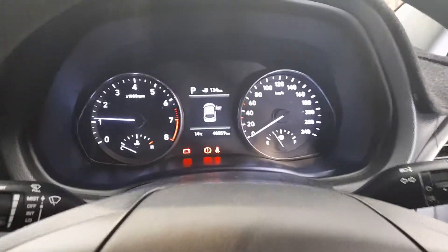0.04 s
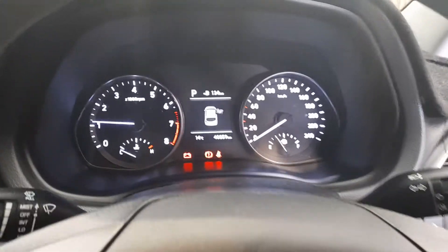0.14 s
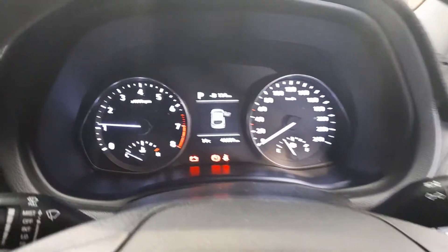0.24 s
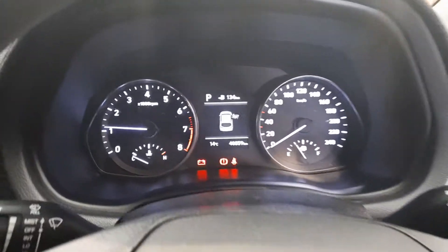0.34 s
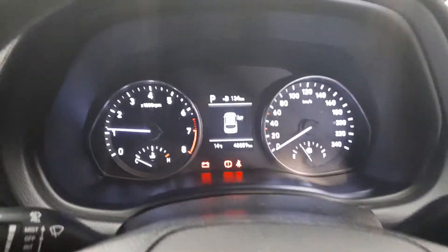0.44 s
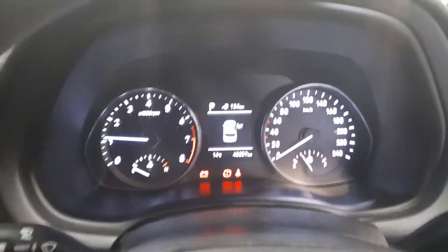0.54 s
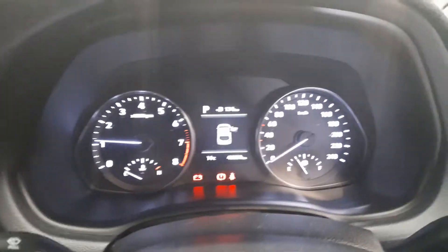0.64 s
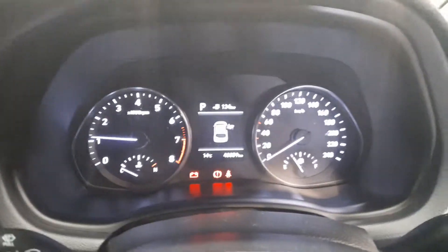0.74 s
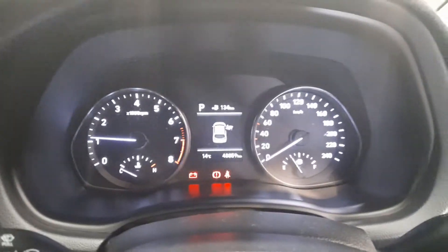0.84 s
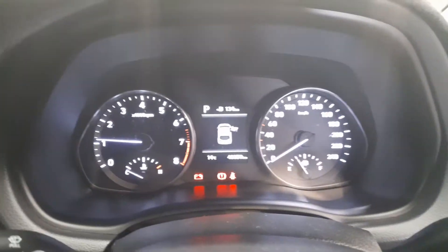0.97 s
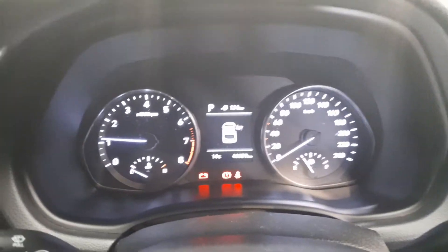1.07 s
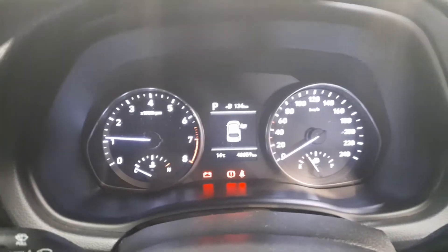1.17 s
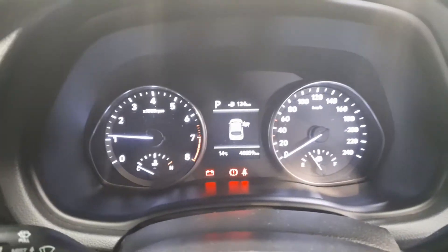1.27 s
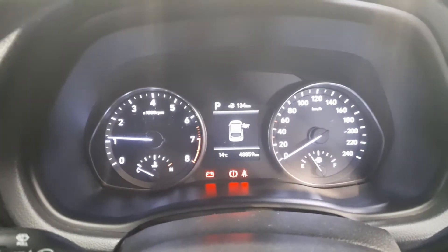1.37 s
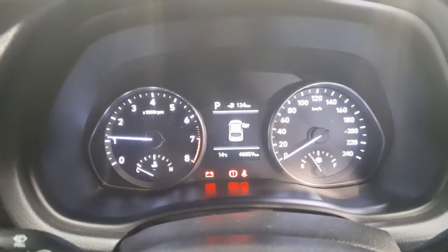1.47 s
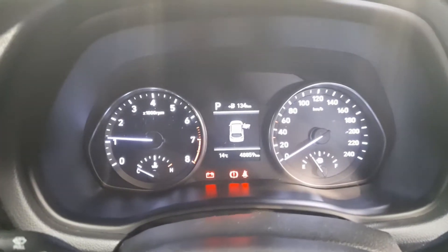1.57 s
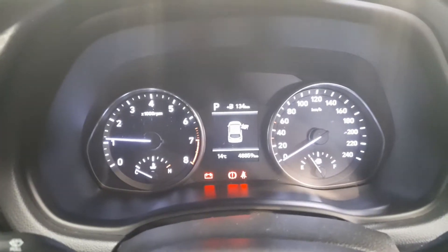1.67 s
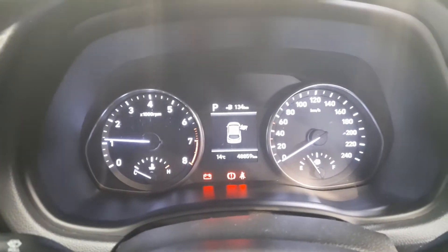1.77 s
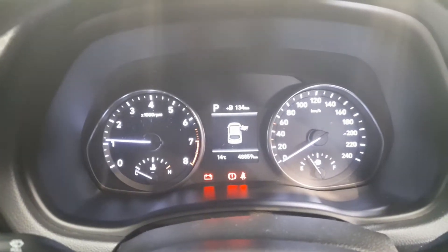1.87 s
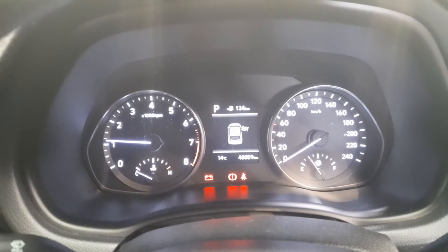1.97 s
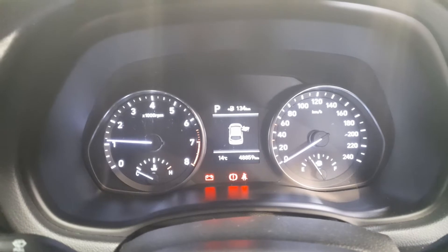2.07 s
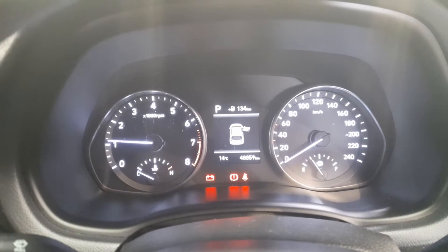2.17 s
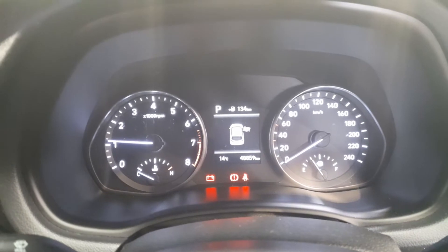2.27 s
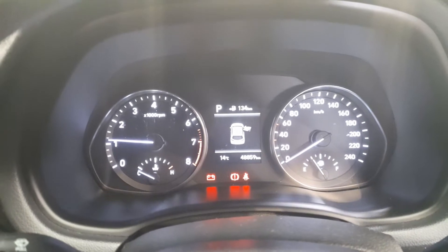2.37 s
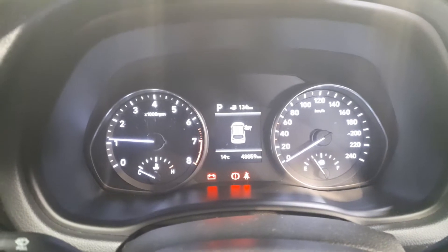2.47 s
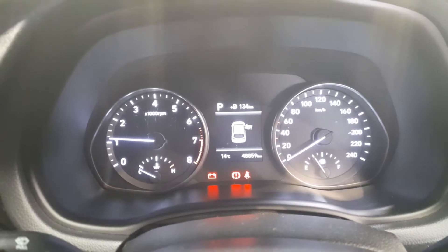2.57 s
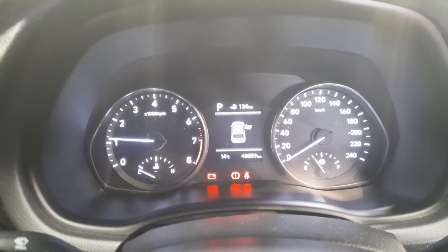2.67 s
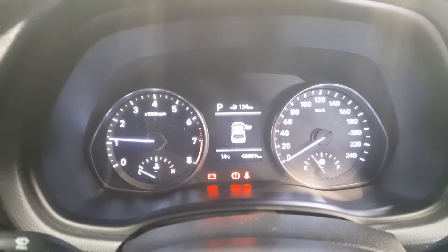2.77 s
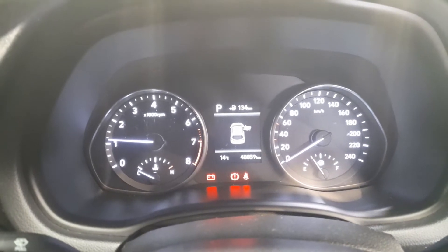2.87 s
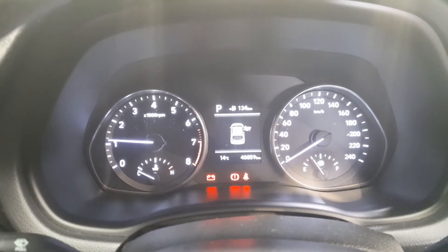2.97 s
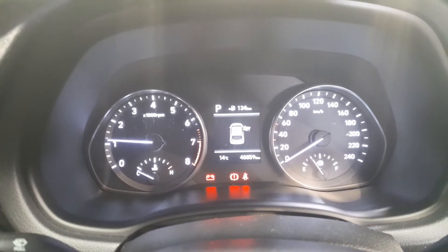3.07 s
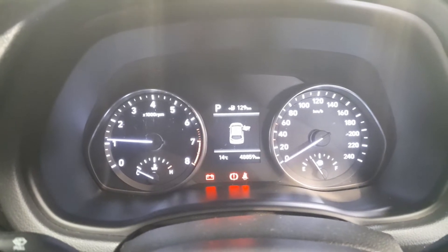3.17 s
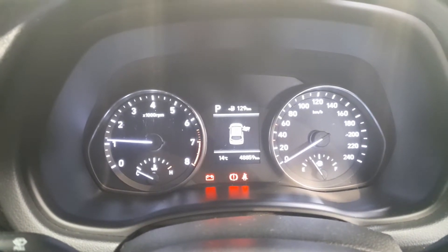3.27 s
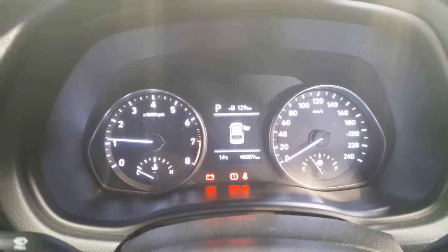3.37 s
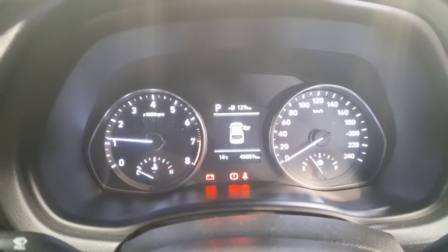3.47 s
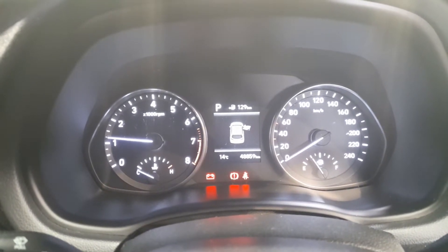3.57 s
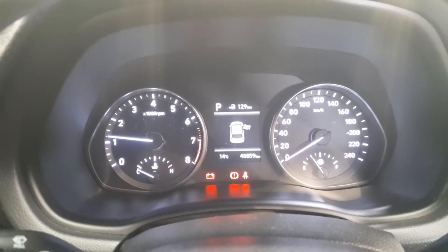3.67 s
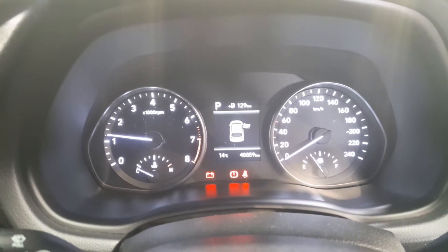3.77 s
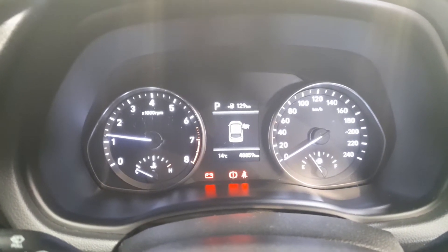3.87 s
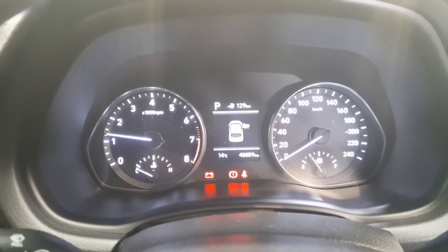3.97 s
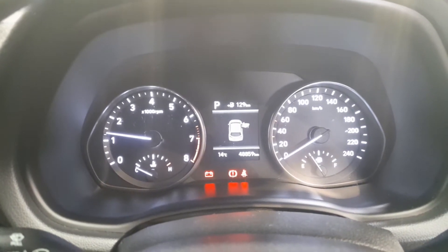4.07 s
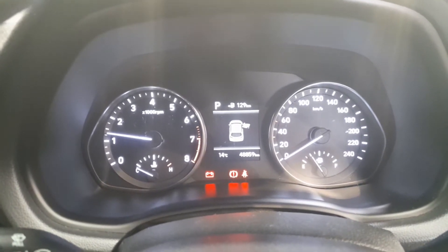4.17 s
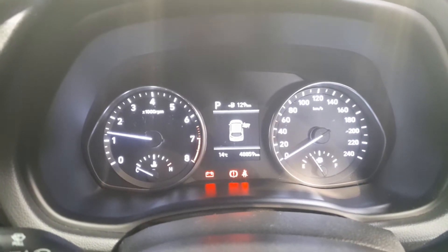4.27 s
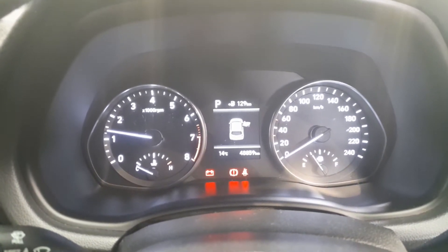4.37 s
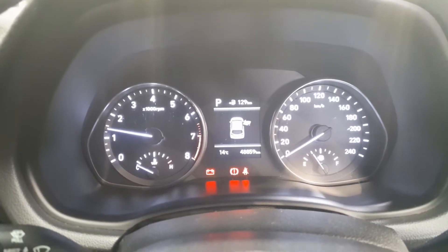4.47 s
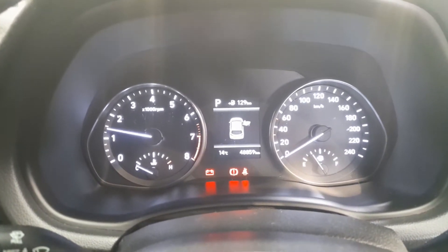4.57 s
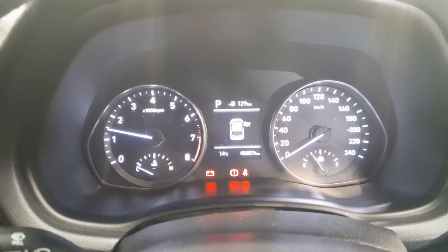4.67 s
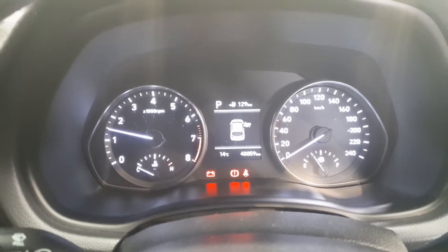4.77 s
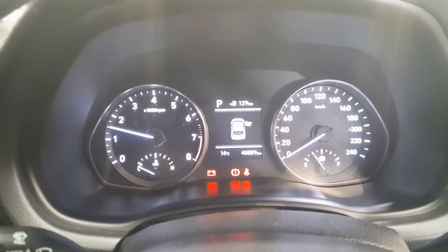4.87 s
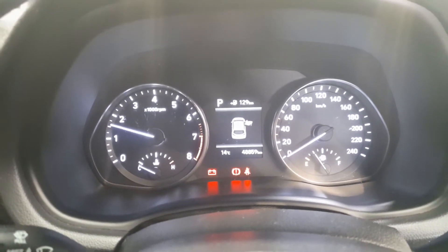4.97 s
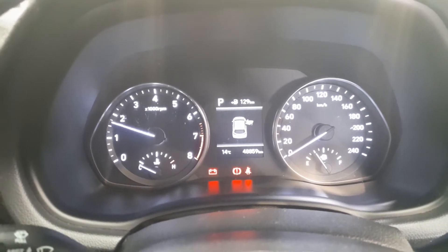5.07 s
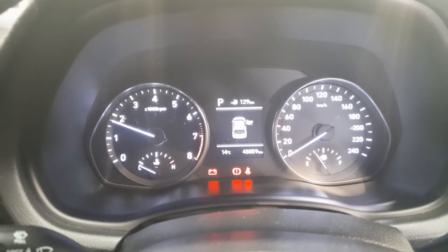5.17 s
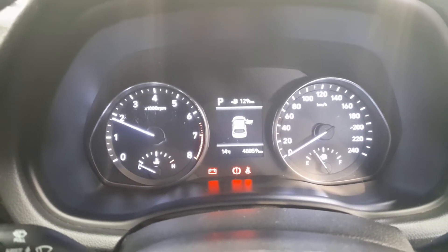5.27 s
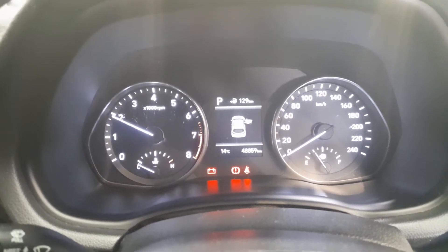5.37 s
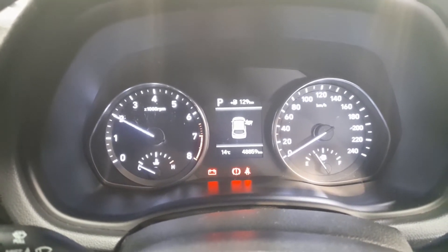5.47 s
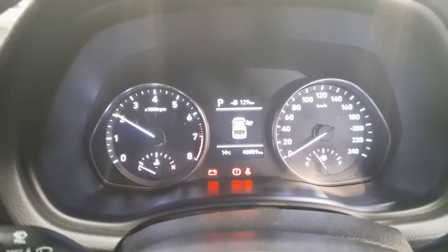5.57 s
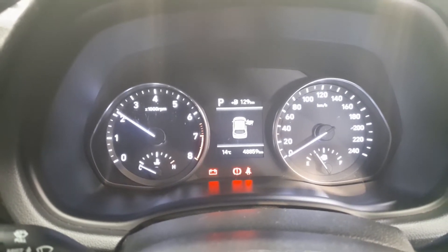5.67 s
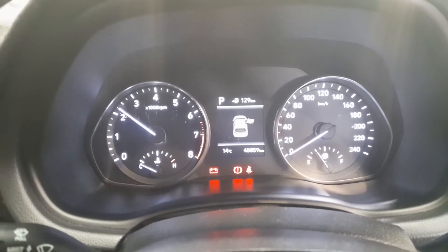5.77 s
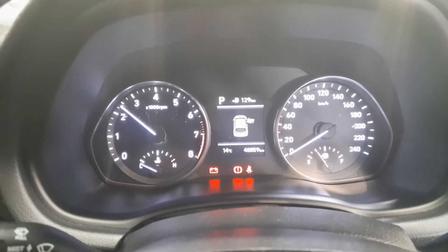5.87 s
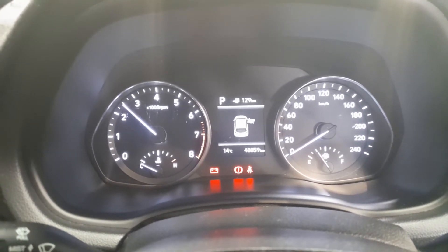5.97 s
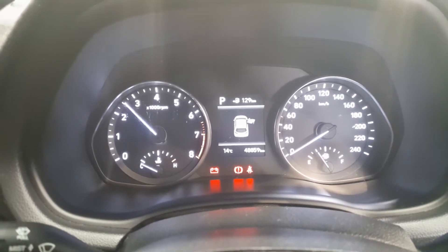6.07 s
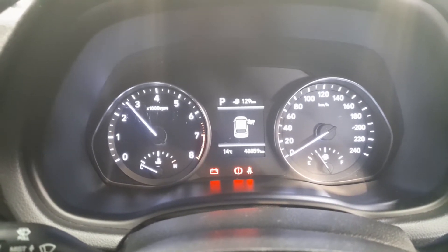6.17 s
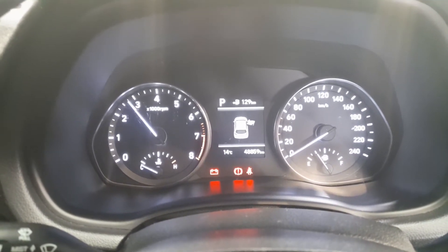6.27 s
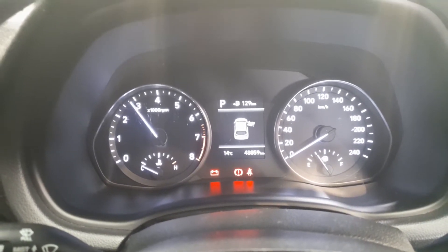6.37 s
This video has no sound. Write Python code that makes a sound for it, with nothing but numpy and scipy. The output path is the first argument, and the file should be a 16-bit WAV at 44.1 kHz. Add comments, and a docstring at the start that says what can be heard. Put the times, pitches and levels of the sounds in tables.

```python
"""A four-cylinder petrol engine idles fast, then is slowly revved; the microphone is at the driver's seat.
Its firing booms in the air modes of the parked car's cabin, under the growl of unequal cylinders, ringing
panels, a belt whine, and the hiss, ticking and intake roar of the engine bay. Early on, right at the
microphone, the hand shifts its grip with snaps, a knock and a rustle. Two faint squeaks and a scuff pass;
about two seconds in, something hoarse sounds far outside."""
import sys
import numpy as np
from scipy import signal
from scipy.fft import rfft, irfft, next_fast_len
from scipy.io import wavfile

SR = 44100
rng = np.random.default_rng(int(sys.argv[2]) if len(sys.argv) > 2 else 0)


def log_audio(samples):
    """Write samples as a 16-bit WAV file to the path given in sys.argv[1]."""
    # one column per channel
    frames = np.atleast_2d(samples).T
    # limit to full scale, then quantise
    limited = np.clip(frames, -1, 1)
    pcm = np.round(limited * 32767).astype(np.int16)
    wavfile.write(sys.argv[1], SR, pcm)


N = 283122
PORT_LAG_S = 0.00029  # the engine reaches the microphone's left port this much after the right


def from_db(db):
    """Decibels to gain."""
    return 10 ** (np.asarray(db) / 20)


def rms_one(x):
    """Scale to unit power."""
    return x / np.sqrt(np.mean(x ** 2) + 1e-20)


def in_time(rows):
    """A curve of (time, value) rows, sample by sample."""
    times, values = np.transpose(rows)
    return np.interp(np.arange(N) / SR, times, values)


def at_hz(points, hz):
    """Read a spectrum on a log-frequency axis."""
    knots_hz, values = np.transpose(points)
    return np.interp(np.log(hz + 1e-9), np.log(knots_hz), values)


def peaks_db(resonances, hz):
    """Gain in dB of a set of peaks and dips, met at a moving frequency."""
    grid = np.geomspace(30, 1500, 3000)
    response_db = sum(db / (1 + (2 * (grid - centre) / width) ** 2) for centre, width, db in resonances)
    return np.interp(hz, grid, response_db)


def level_db_at(law, octaves, throttle):
    """A layer's level steps as the throttle opens and follows a power of the octaves above idle."""
    idle_db, open_db, octave_db, exponent = law
    return idle_db + open_db * throttle + octave_db * octaves ** exponent


def pan(side_db):
    """Left and right gains for a level difference, left minus right."""
    gains = from_db(np.array([[.5], [-.5]]) * side_db)
    return gains / gains.mean(axis=0)


def arch(start_s, length_s):
    """A half-sine rise and fall."""
    return np.sin(np.pi * np.clip((np.arange(N) / SR - start_s) / length_s, 0, 1))


def drift(rate_hz):
    """A random wander of unit power."""
    knots = rng.standard_normal(2000)
    return rms_one(np.interp(np.arange(N) / SR * rate_hz, np.arange(len(knots)), knots))


def resonate(x, hz, width_hz):
    """One resonance with gain 1 at its peak."""
    r = np.exp(-np.pi * width_hz / SR)
    feedback = [1, -2 * r * np.cos(2 * np.pi * hz / SR), r * r]
    return signal.lfilter(np.array([1, 0, -1]) * (1 - r * r) / 2, feedback, x + 1e-18)


def noise(spectrum):
    """Two unrelated noises of one colour."""
    size = next_fast_len(N)
    hz = np.arange(size // 2 + 1) * SR / size
    white = rfft(rng.standard_normal((2, size)))
    return rms_one(irfft(white * from_db(at_hz(spectrum, hz)), size)[:, :N])


def narrow(hz, width_hz):
    """Two unrelated narrow bands of noise around a centre that may move."""
    lowpass = signal.butter(2, np.clip(width_hz / 2, 2, 4000), fs=SR, output="sos")
    a, b = signal.sosfilt(lowpass, rng.standard_normal((2, 2, N)))
    angle = 2 * np.pi * np.cumsum(hz * np.ones(N)) / SR
    return rms_one(a * np.cos(angle) + b * np.sin(angle))


def at_ports(pair):
    """The cabin field at the microphone, at unit level: alike in the bass, stronger on the right."""
    # likeness of the two ports: (frequency [Hz], correlation [ratio])
    likeness = [(60, 1), (150, 0.91), (300, 0.73), (600, 0.88), (1200, 0.6), (2500, 0.15), (5000, 0.059),
                (16000, 0.041)]
    # their balance: (frequency [Hz], left minus right [dB])
    balance = [(60, -2), (110, -3.5), (200, -3), (380, -5.5), (700, -0.5), (1290, 0), (2380, -6.5),
               (4400, -8.5), (8120, -4.5), (15000, -3.5)]
    size = next_fast_len(N)
    hz = np.arange(size // 2 + 1) * SR / size
    mid, side = rfft(pair, size)
    alike = np.clip(at_hz(likeness, hz), -.99, .999)
    field = np.sqrt(1 + alike) * mid + np.sqrt(1 - alike) * side * [[1], [-1]]
    field[0] *= np.exp(-2j * np.pi * hz * PORT_LAG_S)
    # reflections from glass and trim leave fine peaks and dips above the bass
    knots_hz = np.arange(0, SR / 2, 24)
    ripple_db = 1.8 * rng.standard_normal(len(knots_hz)) * np.minimum(knots_hz / 2500, 1)
    gains = pan(at_hz(balance, hz)) * from_db(np.interp(hz, knots_hz, ripple_db))
    out = irfft(field * gains, size)[:, :N]
    return out / np.std(out.mean(axis=0))


def left_late(pair):
    """Sound from the engine reaches the right port first."""
    n = np.arange(N)
    return np.array([np.interp(n - PORT_LAG_S * SR, n, pair[0]), pair[1]])


def far_swells(ring_hz=1700, yard_t60_s=1.1, yard_db=-1.5):
    """Far outside, a hoarse gliding tone stirs a steady ring and lingers between the yard's walls."""
    # swells: (start [s], length [s], first pitch [Hz], last pitch [Hz], relative level [dB])
    swells = [(1.94, 0.06, 680, 670, -50), (2.0, 0.19, 680, 790, -42.5), (2.183, 0.06, 870, 810, -41)]
    # their partials: (multiple of the pitch [ratio], width [Hz], relative level [dB])
    partials = [(1, 150, 0), (0.93, 330, -3), (1.97, 150, -9), (2.0, 900, -7)]
    pitch = in_time([point for s, length, first, last, _ in swells
                     for point in ((s, first), (s + length, last))])
    envelope = sum(from_db(db + 2) * arch(s, length) for s, length, _, _, db in swells)
    tone = sum(from_db(db) * narrow(multiple * pitch, width) for multiple, width, db in partials)
    ring = from_db(-5.5) * narrow(ring_hz, width_hz=120)
    direct = envelope * at_ports(tone + ring)
    echoes = rng.standard_normal((2, SR)) * from_db(-60 * np.arange(SR) / SR / yard_t60_s)
    tail = signal.fftconvolve(direct, rms_one(echoes) / np.sqrt(SR), axes=1)[:, :N]
    return direct + from_db(yard_db) * tail


def squeaks(squeak_db=-71, rustle_db=-65.5, stutter_db=5.0, wander_hz=190, fade_s=0.069):
    """Two faint, very high squeaks stutter along their glides, over a fine rustle."""
    # one glide for each squeak: (time [s], pitch [Hz])
    glides = [
        [(1.07, 11900), (1.2, 11400), (1.33, 11600), (1.42, 12900), (1.56, 13300), (1.73, 11900), (1.84, 10300)],
        [(4.03, 14000), (4.13, 15100), (4.27, 15750), (4.42, 15200), (4.56, 15600), (4.75, 13400)],
    ]
    # the rustle: (frequency [Hz], relative density [dB])
    spectrum = [(7000, -40), (10000, -12), (11400, 0), (13500, 0), (15700, -4), (17000, -30)]
    t = np.arange(N) / SR
    out = 0
    for glide in glides:
        envelope = np.clip(np.minimum(t - glide[0][0], glide[-1][0] - t) / fade_s, 0, 1)
        level = from_db(squeak_db + stutter_db * drift(40))
        tone = level * narrow(in_time(glide) + wander_hz * drift(35), width_hz=300)
        out = out + np.sqrt(envelope) * tone + envelope * from_db(rustle_db) * noise(spectrum)
    return out


def scuff(start_s=5.095, level_db=-45.5, decay_s=0.055):
    """A brief hollow scuff starts at once and dies away as the revs climb."""
    age = np.arange(N) / SR - start_s
    envelope = (age >= 0) * np.exp(-np.abs(age) / decay_s)
    return from_db(level_db) * envelope * narrow(hz=1530, width_hz=300)


def finger_rubs(grain_db=2.5):
    """Fingers slide on the microphone's case with a grainy rustle, mostly on the right."""
    # slides: (start [s], length [s], relative level [dB])
    slides = [(0.3, 0.087, -63), (0.576, 0.27, -54), (3.77, 0.11, -59.5)]
    # skin on the case: (frequency [Hz], relative density [dB])
    spectrum = [(150, 4.5), (300, 8.5), (600, -1), (1200, -4), (3000, -19.5), (6500, -13), (8200, -25),
                (12000, -21), (16000, -18)]
    envelope = sum(from_db(db + 10) * arch(s, length) for s, length, db in slides)
    return at_ports(noise(spectrum)) * envelope * from_db(grain_db * drift(190)) * pan(-14.0)


def finger_knocks(rise_s=0.0023, sealed_hz=180, closing_s=0.0011):
    """A fingertip bumps the right port, whose resonance drops as it is closed."""
    # bumps: (time [s], envelope peak [dB], starting pitch [Hz])
    bumps = [(0.633, -15.5, 1760), (0.723, -23, 400), (0.757, -24, 604)]
    out = 0
    for s, db, start_hz in bumps:
        age = np.clip(np.arange(N) / SR - s, 0, .1)
        turns = sealed_hz * age + (start_hz - sealed_hz) * closing_s * (1 - np.exp(-age / closing_s))
        envelope = age / rise_s * np.exp(1 - age / rise_s)
        out = out - from_db(db) * envelope * np.sin(2 * np.pi * turns)
    return out * from_db([[-26], [0]])


def case_snaps():
    """The microphone's case gives way in tiny snaps, each ringing for well under a millisecond."""
    # snaps: (time [s], peak [dB], left minus right [dB])
    snaps = [(.3318, -22, -26), (.3366, -22, -26), (.349, -33, -16), (.7127, -36, -16), (.76, -36, -18),
             (.8039, -33, -20), (.8268, -38, -13), (.8665, -37, 9), (1.033, -40, -14)]
    # modes of the case: (frequency [Hz], width [Hz], relative level [dB])
    modes = [(5400, 2000, 0), (13600, 2800, 0)]
    clicks = np.zeros((2, N))
    for s, db, side_db in snaps:
        ports = pan(side_db)[:, 0]
        clicks[:, int(s * SR)] = from_db(db) * ports / ports.max()
    rung = sum(from_db(db) * resonate(resonate(clicks, hz, width), hz, width) for hz, width, db in modes)
    return rung * clicks.max() / np.abs(rung).max()


def body_rumble(growl_db, idle_db=-42.0, growth=0.16):
    """Loose low noise of the car's body, all round the seat, grows more slowly than the growl."""
    # the rumble: (frequency [Hz], relative density [dB])
    spectrum = [(20, -43), (35, 9), (70, 5.5), (110, 7), (170, 3), (220, -1.5), (260, -2), (350, -3),
                (520, -8), (750, -4.5), (1050, -16.5), (1600, -50)]
    return from_db(idle_db + growth * (growl_db - growl_db[0])) * at_ports(noise(spectrum))


def trim_buzz(firings, firing_hz, throb=0.56):
    """A loose piece of trim buzzes, in time with the firing, at the engine speeds that shake it."""
    # those speeds: (firing rate [Hz], span [Hz], level [dB])
    speeds = [(62, 7, -52.5), (67, 6, -51), (95.4, 1.1, -46)]
    shake = sum(from_db(db) * np.exp(-(2 * (firing_hz - rate) / span) ** 2) for rate, span, db in speeds)
    return shake * (1 + throb * np.cos(2 * np.pi * firings)) * at_ports(narrow(hz=710, width_hz=100))


def bay_hiss(firings, bay_db, throb=0.041, flutter_db=0.5):
    """Air and friction noise of the engine bay, throbbing with the firing."""
    # the hiss: (frequency [Hz], relative density [dB])
    spectrum = [(300, -24), (700, -3.5), (1050, -3), (1700, 0.5), (2050, -1), (2800, -3.5), (3200, -11),
                (4500, -14), (5300, -10), (6300, -15), (7200, -22.5), (8200, -33.5), (10500, -25),
                (15000, -24.5)]
    air = at_ports(noise(spectrum)) * (1 + throb * np.cos(2 * np.pi * firings))
    return from_db(bay_db + 7 + flutter_db * drift(30)) * air


def valve_ticking(firings, bay_db, sharpness=2.5, floor=0.32):
    """A short rattle at each firing rings the valve gear."""
    # modes of the valve gear and its cover: (frequency [Hz], width [Hz], relative level [dB])
    modes = [(2577, 36, -14.5), (2764, 45, -7.5), (3506, 40, -14.5), (5200, 220, -35)]
    blows = floor + np.exp(-sharpness * (firings % 1))
    rattle = rng.standard_normal((2, N)) * blows
    valves = sum(from_db(db) * rms_one(resonate(rattle, hz, width)) for hz, width, db in modes)
    return from_db(bay_db - 9) * at_ports(valves)


def injector_whirr(firings, base_db=-56, wander_hz=11, throb=0.057):
    """The injectors' two rings wander and throb once per engine cycle, as one injector is louder."""
    # rings: (frequency [Hz], width [Hz], relative level [dB], share of the level swing [ratio])
    rings = [(1358, 62, 0, 1.0), (1605, 60, -2.5, 0.5)]
    # course of the lower ring: (time [s], level [dB])
    ring_level = [(0, -53), (.9, -56.5), (3.2, -57), (3.6, -54), (4.5, -51), (4.8, -65), (5.5, -50),
                  (6.2, -53.5), (6.42, -43)]
    swing_db = in_time(ring_level) - base_db
    out = 0
    for hz, width, db, share in rings:
        ring = at_ports(narrow(hz + wander_hz * drift(14), width))
        out = out + from_db(base_db + db + share * swing_db) * ring
    return out * (1 + throb * np.cos(np.pi * firings / 2))


def intake_roar(firings, octaves, full_db=-45, full_octaves=1.38, db_per_octave=25.5, throb=0.2):
    """Air rushes into the cylinders in gulps, and blooms near top speed."""
    # the roar: (frequency [Hz], relative density [dB])
    spectrum = [(800, -24), (1200, 7), (1550, -21), (1950, 6), (2300, -6.5), (2750, 7), (3200, -6.5),
                (4200, -17), (6500, -16), (9000, -32), (15000, -43)]
    level_db = full_db - db_per_octave * np.maximum(full_octaves - octaves, 0)
    return from_db(level_db) * (1 + throb * np.cos(2 * np.pi * firings)) * at_ports(noise(spectrum))


def belt_whine(firing_hz, octaves, throttle, idle_order=11.36, open_order=11.55, slip=0.00537):
    """A belt-driven rotor follows the crankshaft, slipping a little; it breaks up and fades with revs."""
    # level with speed: (idle [dB], open throttle adds [dB], first octave adds [dB], exponent)
    law = (-50, -1.8, -5, 4)
    # the panel that swells the passing whine: (frequency [Hz], width [Hz], lift [dB])
    panel = [(702, 36, 7)]
    order = idle_order + (open_order - idle_order) * throttle
    hz = firing_hz * order * (1 + slip * drift(11))
    level_db = level_db_at(law, octaves, throttle) + peaks_db(panel, hz) + 2.5 * drift(25.11)
    rough_share = np.clip(.1 + octaves, 0, .85)
    clean = np.sqrt(2 * (1 - rough_share)) * np.sin(2 * np.pi * np.cumsum(hz) / SR)
    rough = np.sqrt(rough_share) * narrow(hz, width_hz=90)[0]
    return from_db(level_db) * (clean + rough) * pan(-6.5)


def combustion_chuff(firings, octaves, top_db=-44, db_per_octave=13, sharpness=2.8, uneven_db=2.0):
    """At high revs each firing adds a rough puff of its own strength, thudding through the bulkhead."""
    # the puffs: (frequency [Hz], relative density [dB])
    spectrum = [(110, -41), (200, -1), (330, 5.5), (500, 2.5), (590, -10), (1000, -37), (4000, -72)]
    strengths = from_db(uneven_db * rng.standard_normal(int(firings[-1]) + 1))
    puffs = rms_one(strengths[firings.astype(int)] * np.abs(np.sin(np.pi * firings)) ** sharpness)
    level_db = top_db - db_per_octave * (octaves.max() - octaves)
    return from_db(level_db) * puffs * at_ports(noise(spectrum))


def cylinder_growl(firings, firing_hz, growl_db, crank_db=4.0, roughness=0.36):
    """Unequal cylinders repeat every four firings: wavering lines at quarter orders."""
    # how the body shapes the lines: (frequency [Hz], relative level [dB])
    spectrum = [(30, -40), (60, -25), (100, 15.5), (130, -3), (190, -15.5), (260, -1.5), (350, 7),
                (480, -7), (620, -12.5), (900, -20), (1300, -35), (2500, -40)]
    out = np.zeros((2, N))
    grid = np.geomspace(10, 3000, 600)
    for order in np.arange(3, 44) / 4:
        if order in (1, 2, 3, 4):
            continue
        lift_db = crank_db * (order % 0.5 == 0)  # whole turns of the crankshaft stand out
        gain = np.interp(order * firing_hz, grid, from_db(at_hz(spectrum, grid) + lift_db))
        angle = 2 * np.pi * ((order * firings + rng.random()) % 1)
        for part, wave in zip(out, (np.sin, np.cos)):
            part += gain * (1 + roughness * drift(16)) * wave(angle + roughness * drift(20))
    return from_db(growl_db) * at_ports(out)


def panel_overtones(firings, firing_hz, waver_db=2.5, other_share=0.23):
    """Each order sings while engine speed carries it through a panel resonance; high ones lean right."""
    # the engine's clean orders: (multiple of the firing rate [ratio], level before lift [dB])
    orders = [(2, -47.5), (2.5, -61.5), (3, -51), (3.5, -56.5), (4, -55.5), (4.5, -61), (5, -57.5),
              (5.5, -60), (6, -57), (7.5, -67.5), (9, -63.5), (9.5, -70.5), (10.5, -74), (15, -67)]
    # body panels: (frequency [Hz], width [Hz], lift [dB], order that gets the full lift [ratio])
    panels = [(105, 25.6, 16, 2), (132.7, 9.7, 14.5, 3), (145.2, 3.9, 13, 2), (192.8, 19, 8.5, 3),
              (192.4, 8.7, 7, 2), (239.1, 19, 18, 4), (286, 18, 13.5, 3), (312, 19, 19.5, 3.5),
              (360, 41, 5, 4), (480, 46, 15, 5.5), (516, 12, 10, 5.5), (701, 96, 24.5, 10.5),
              (850, 190, 21.5, 10.5), (911, 41, 22, 9.5)]
    out = 0
    for order, db in orders:
        hz = order * firing_hz
        lifts = [(centre, width, lift_db * (1 if best == order else other_share))
                 for centre, width, lift_db, best in panels]
        level = from_db(db + peaks_db(lifts, hz) + waver_db * drift(18))
        wobble = .007 * order * drift(55)  # uneven turning of the crankshaft blurs high orders most
        offset = rng.random() * (order % 1 > 0)  # whole orders keep step and sharpen the firing's dip
        side_db = at_hz([(230, -1.0), (310, -6.0)], hz)
        out = out + level * np.cos(2 * np.pi * (order * firings + offset + wobble)) * pan(side_db)
    return -np.sqrt(2) * out


def firing_boom(firings, firing_hz, base_db=-32.5, waver_db=0.53):
    """Each firing dips the cabin pressure: a clean wave that swells and drops across the air modes."""
    # cabin modes and nulls at the driver's seat: (frequency [Hz], width [Hz], gain [dB])
    cabin_modes = [(49.54, 8.6, 8.5), (58.85, 1.6, -7.5), (59.35, 14.3, 13), (65.4, 1.6, -14),
                   (70.76, 3.4, -25.5), (72.2, 12.9, 16), (88.4, 9.2, 12), (96, 2.7, 8.5)]
    # a null at the right port only: (frequency [Hz], width [Hz], added left minus right [dB])
    right_null = [(92.6, 4.2, 9.5)]
    level_db = base_db + peaks_db(cabin_modes, firing_hz) + waver_db * drift(25)
    side_db = -3 + peaks_db(right_null, firing_hz)
    return -np.sqrt(2) * from_db(level_db) * np.cos(2 * np.pi * firings) * pan(side_db)


def scene():
    """From the driver's seat: engine speed drives the car's layers; the hand is close, the swells far."""
    # engine speed, a steady idle until the pedal is pressed: (time [s], firing rate [Hz])
    engine_speed = [(3.09, 37.15), (3.36, 38.9), (3.6, 42.9), (4.02, 44.0), (4.42, 46.7), (4.72, 50.5),
                    (4.86, 55.4), (5.06, 59.9), (5.45, 72.2), (5.6, 76.5), (5.83, 85.3), (5.99, 90.2),
                    (6.28, 96.1), (6.42, 96.5)]
    # levels with speed: (idle [dB], open throttle adds [dB], first octave adds [dB], exponent)
    growl_law = (-53.5, -1.6, 15.5, 0.99)
    bay_law = (-57, 1.43, 2.5, 3.5)
    firing_hz = in_time(engine_speed)
    firings = np.cumsum(firing_hz) / SR
    octaves = np.maximum(np.log2(firing_hz / firing_hz[0]), 0)
    throttle = np.minimum(octaves / 0.179, 1)  # counts as open from 0.179 octaves above idle
    growl_db = level_db_at(growl_law, octaves, throttle)
    bay_db = level_db_at(bay_law, octaves, throttle)
    tones = firing_boom(firings, firing_hz) + panel_overtones(firings, firing_hz)
    tones += belt_whine(firing_hz, octaves, throttle)
    roar = cylinder_growl(firings, firing_hz, growl_db) + combustion_chuff(firings, octaves)
    buzz = trim_buzz(firings, firing_hz)
    bay = bay_hiss(firings, bay_db) + valve_ticking(firings, bay_db)
    bay += injector_whirr(firings) + intake_roar(firings, octaves)
    car = left_late(tones) + roar + buzz + bay + body_rumble(growl_db)
    hand = finger_rubs() + finger_knocks() + case_snaps()
    return car + hand + squeaks() + far_swells() + scuff()


def record(dry):
    """The top of the treble is cut steeply."""
    cutoff_hz = 15800
    return signal.sosfilt(signal.ellip(10, .1, 80, cutoff_hz, fs=SR, output="sos"), dry)


dry = scene()
out = record(dry)
log_audio(out)
```